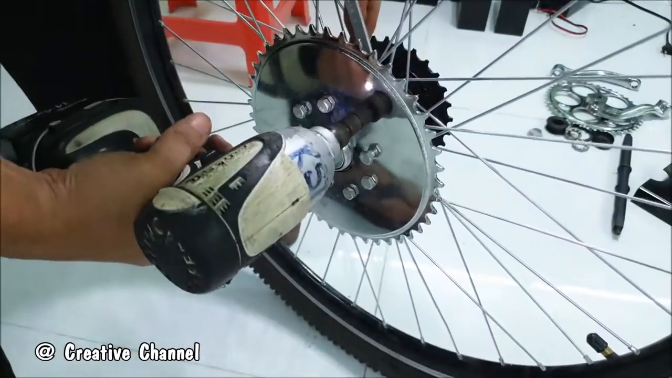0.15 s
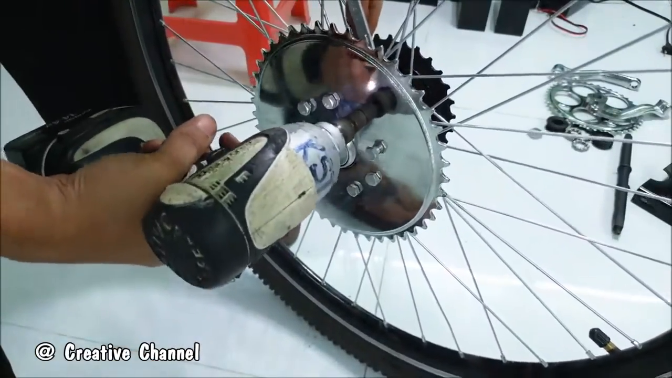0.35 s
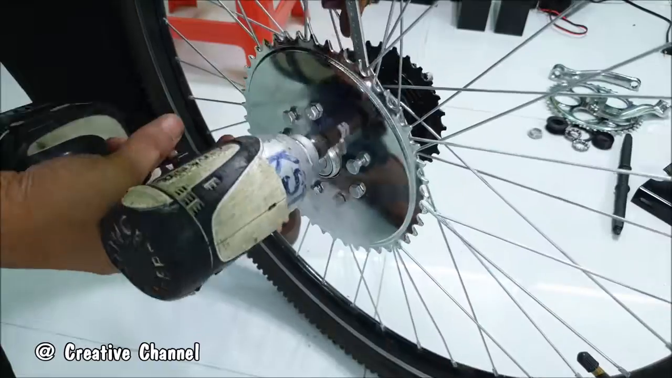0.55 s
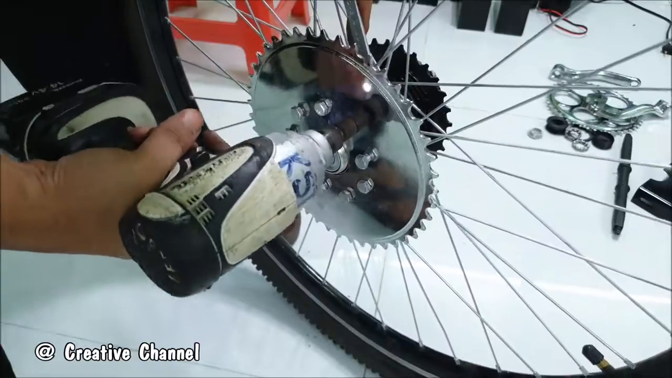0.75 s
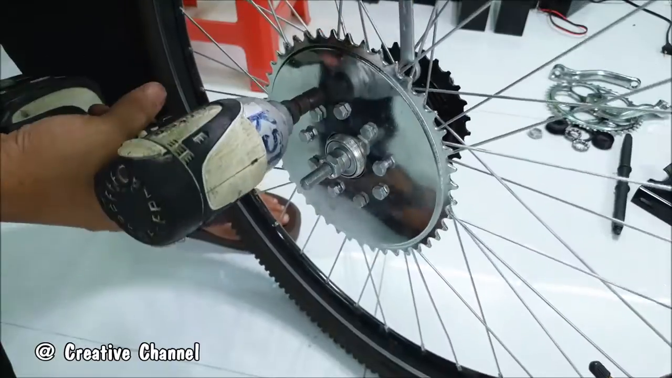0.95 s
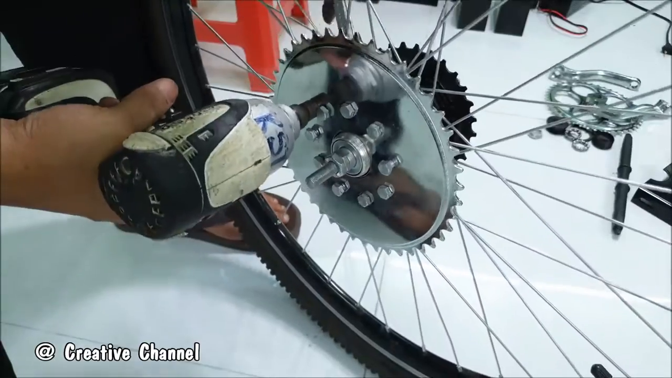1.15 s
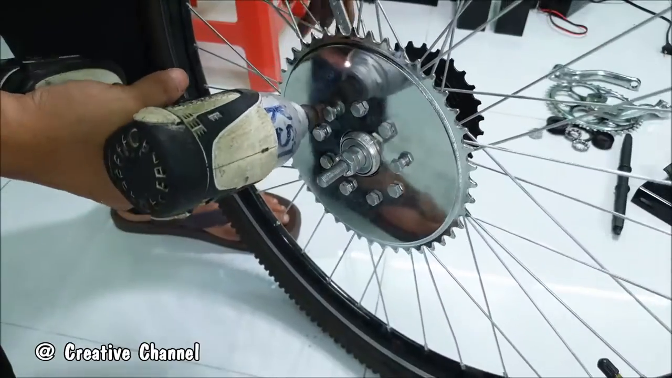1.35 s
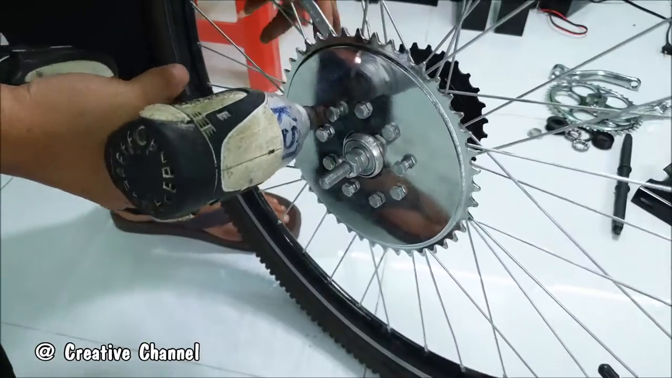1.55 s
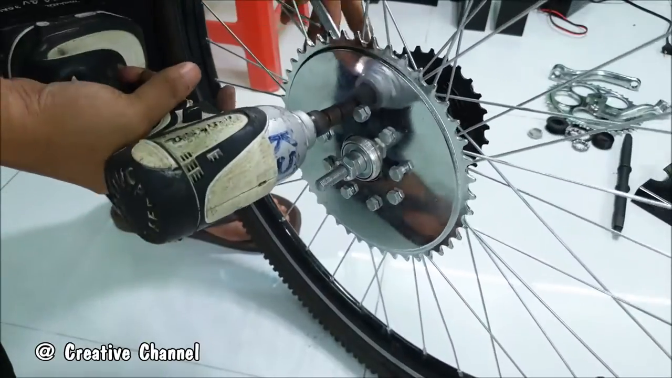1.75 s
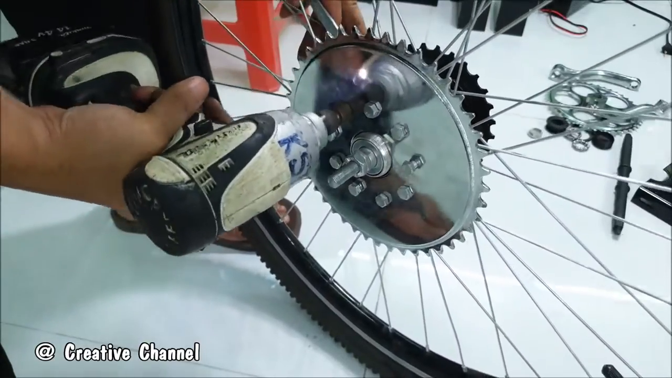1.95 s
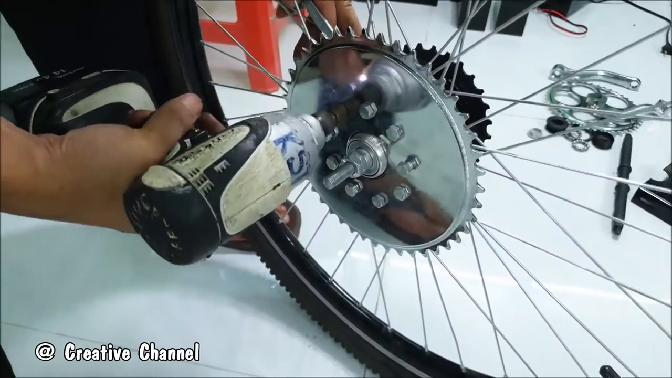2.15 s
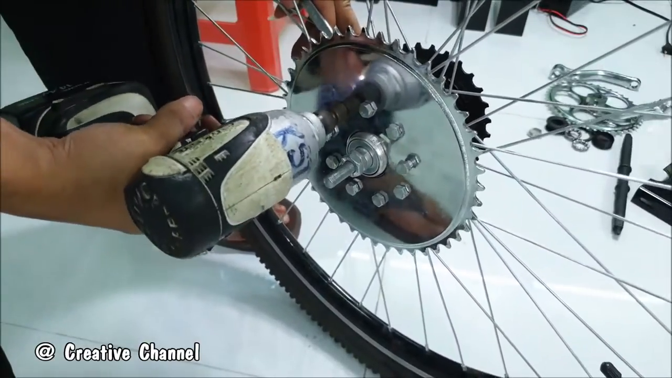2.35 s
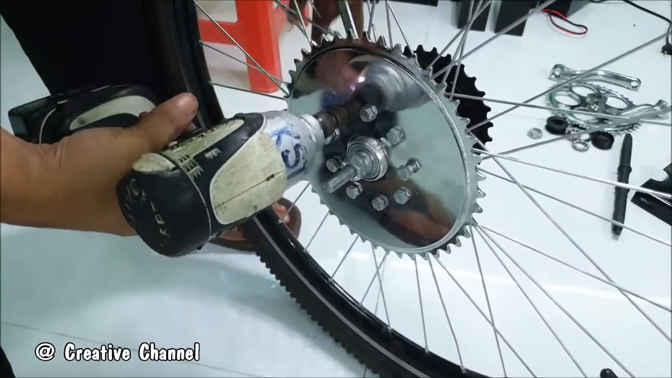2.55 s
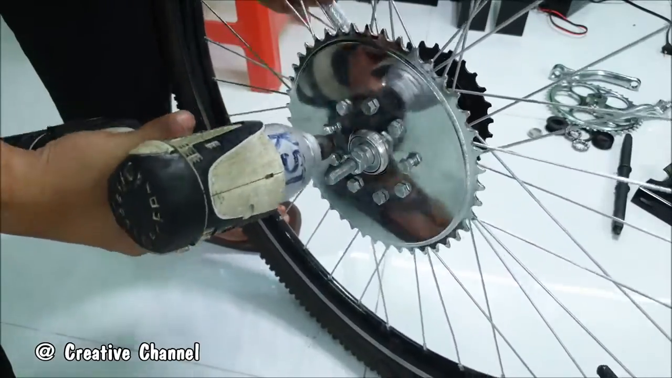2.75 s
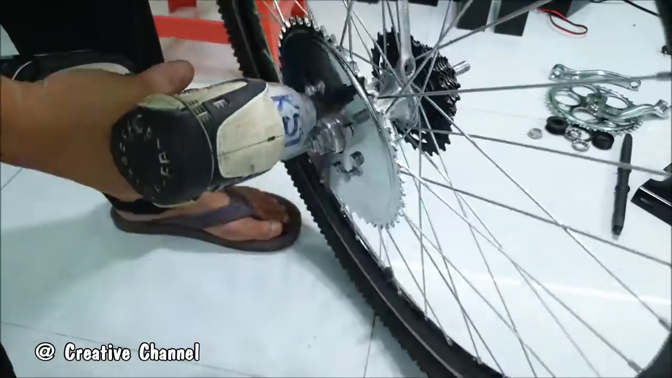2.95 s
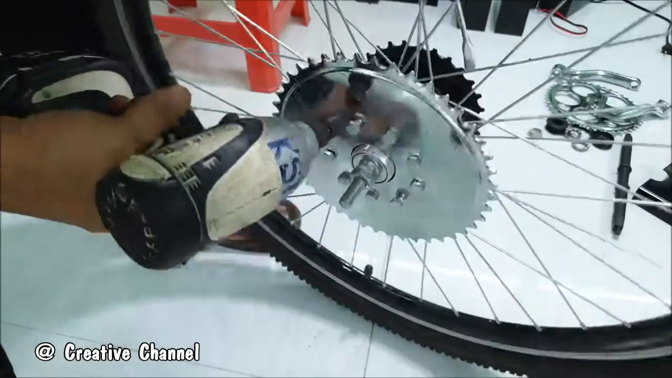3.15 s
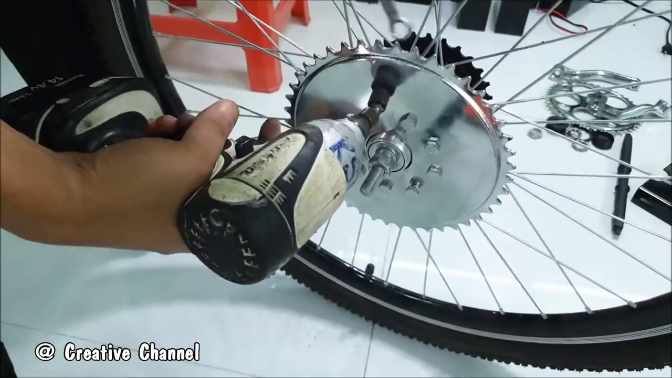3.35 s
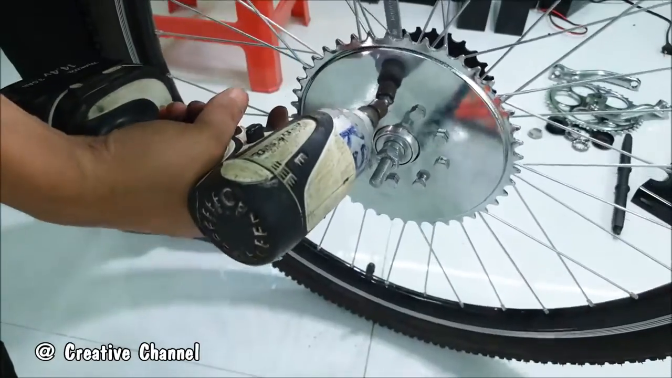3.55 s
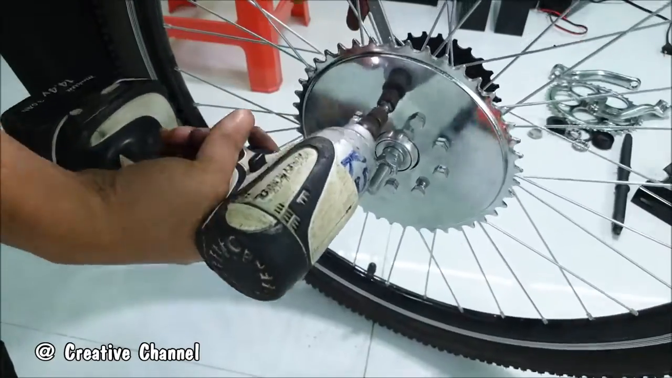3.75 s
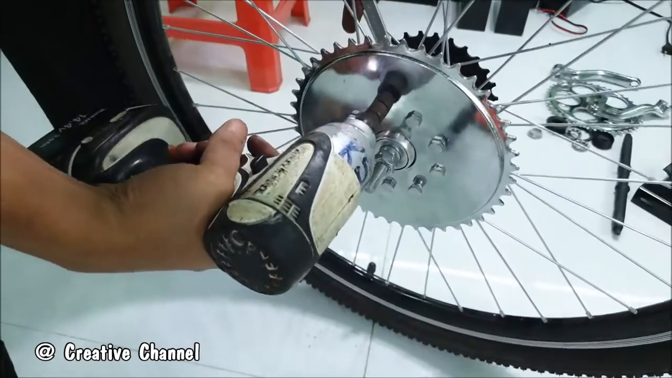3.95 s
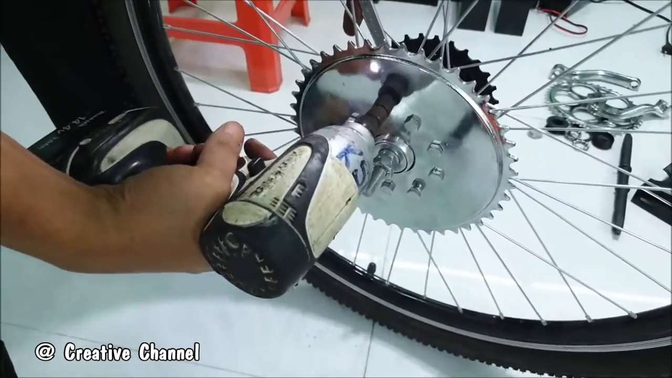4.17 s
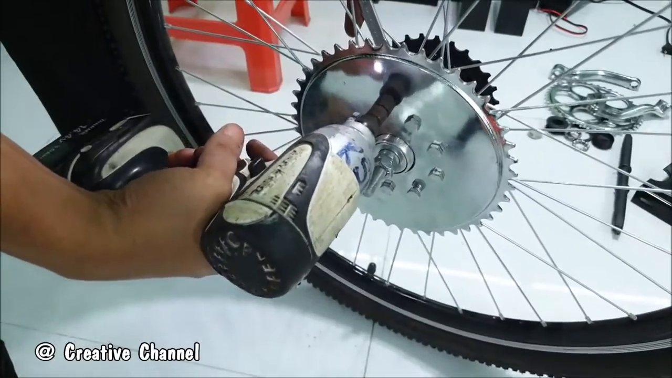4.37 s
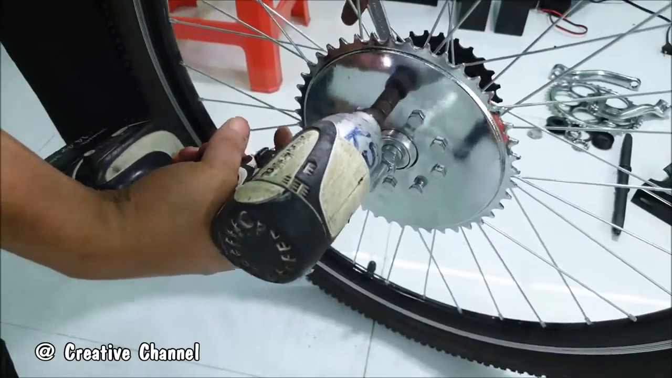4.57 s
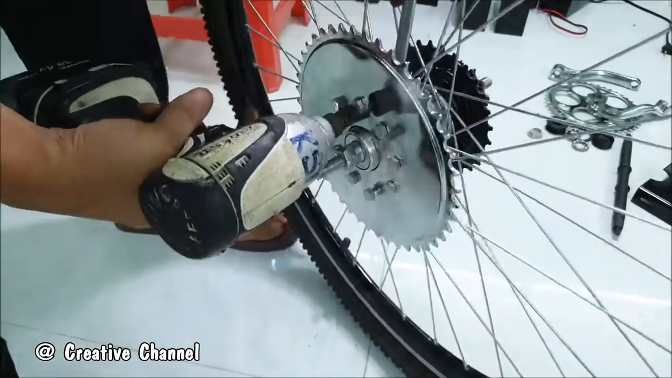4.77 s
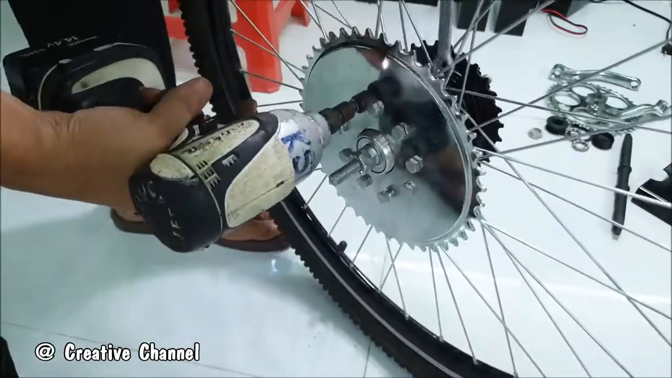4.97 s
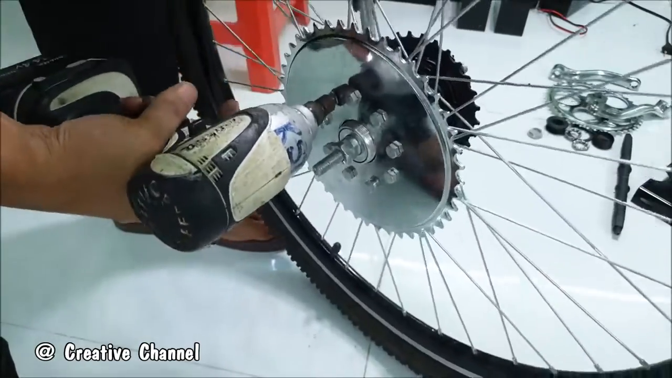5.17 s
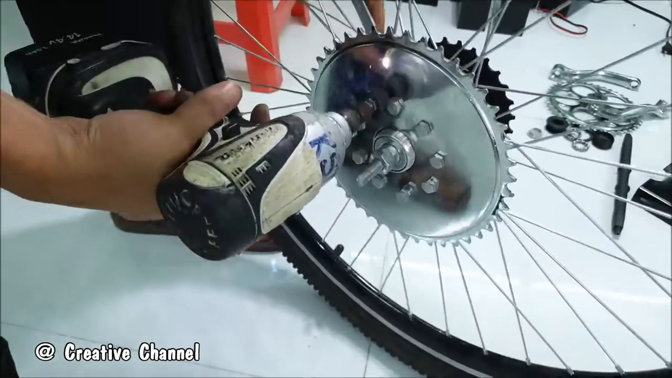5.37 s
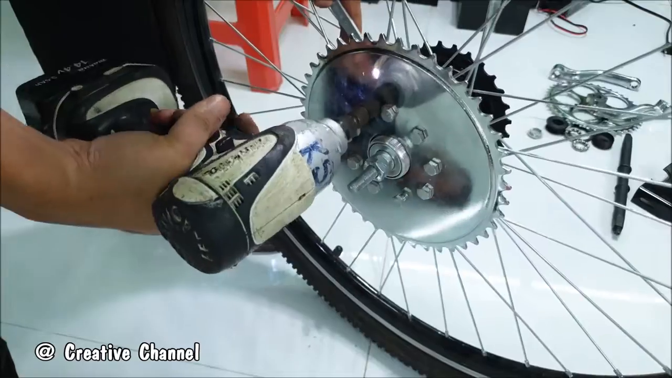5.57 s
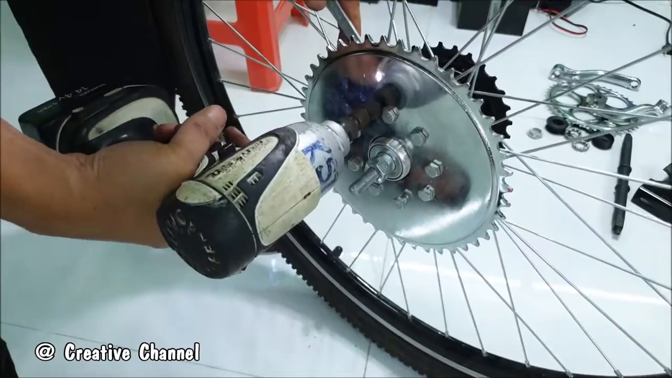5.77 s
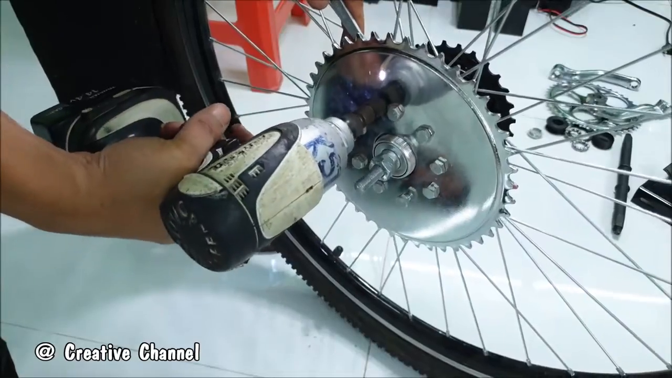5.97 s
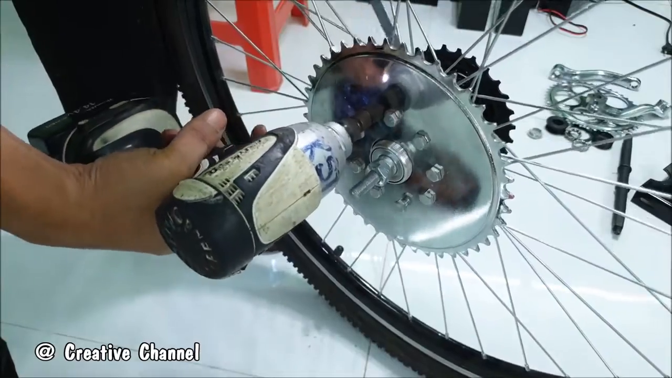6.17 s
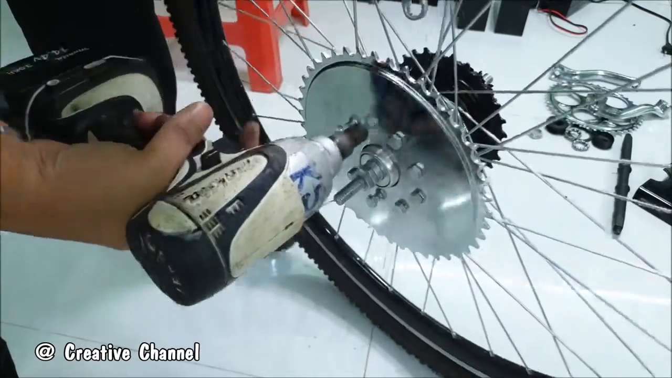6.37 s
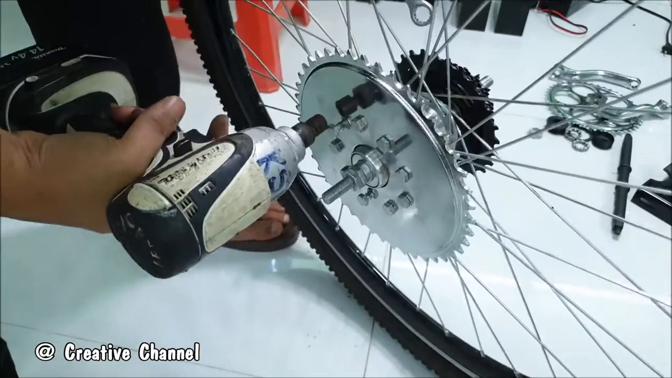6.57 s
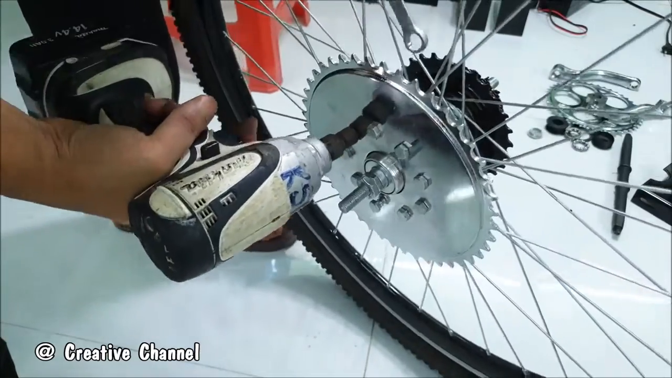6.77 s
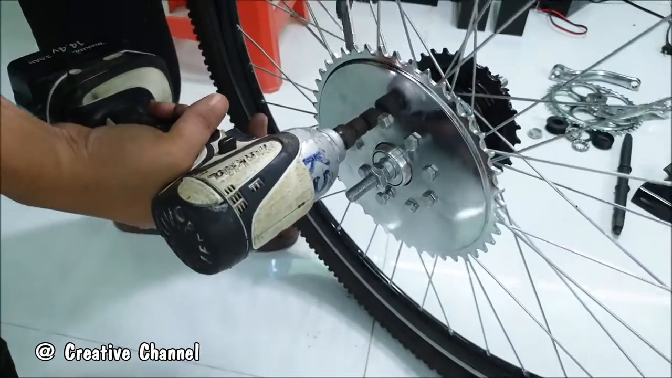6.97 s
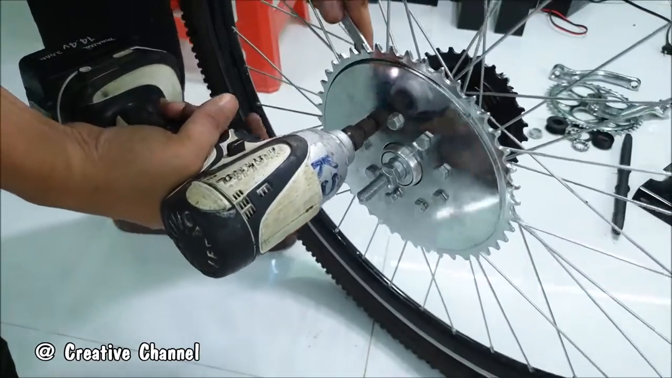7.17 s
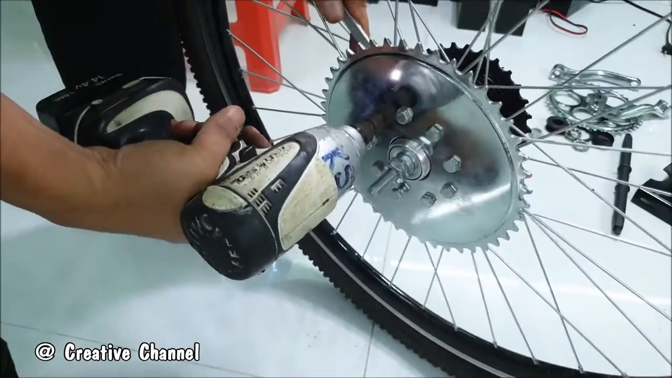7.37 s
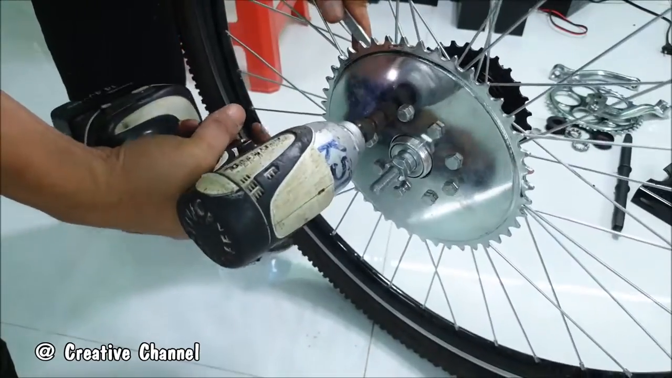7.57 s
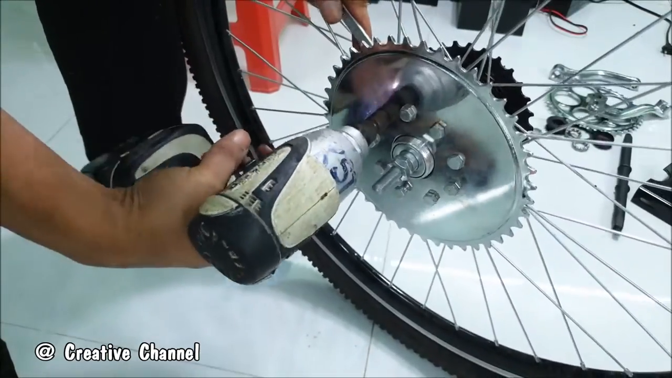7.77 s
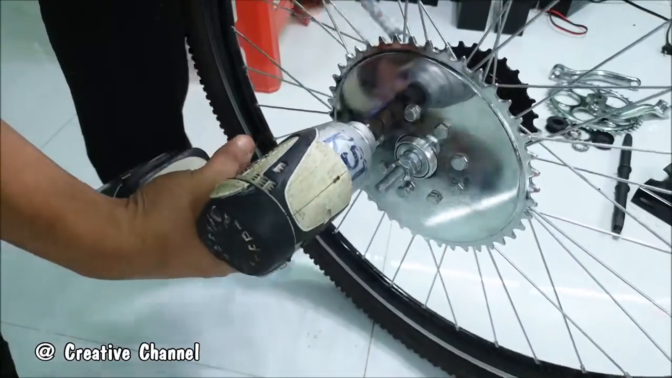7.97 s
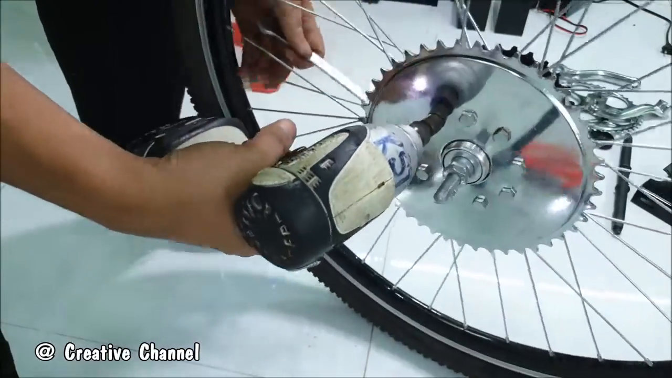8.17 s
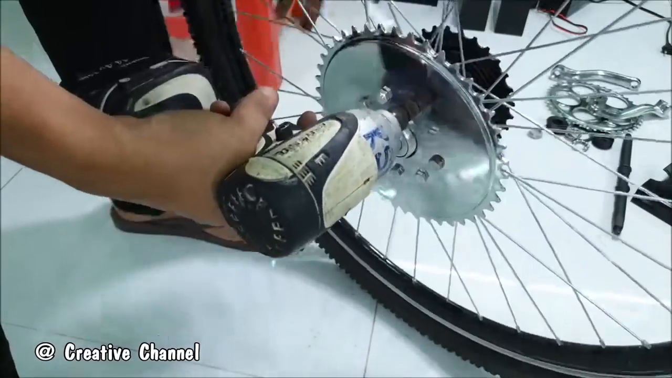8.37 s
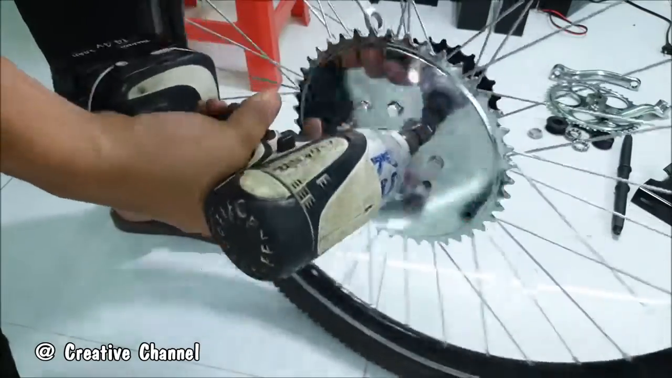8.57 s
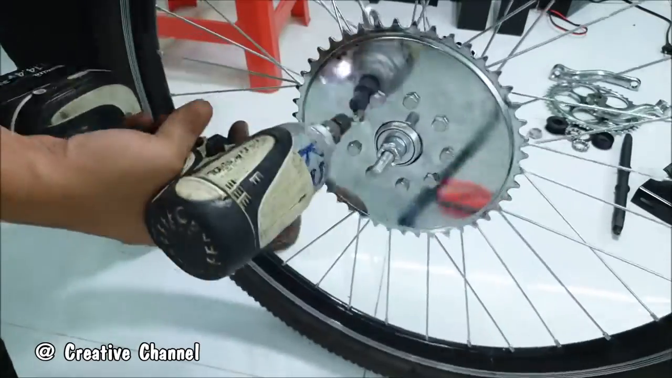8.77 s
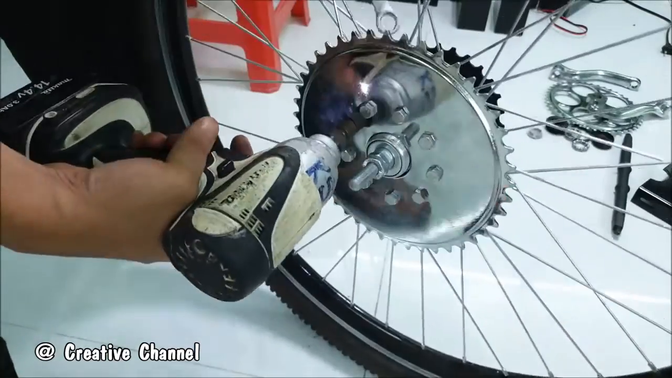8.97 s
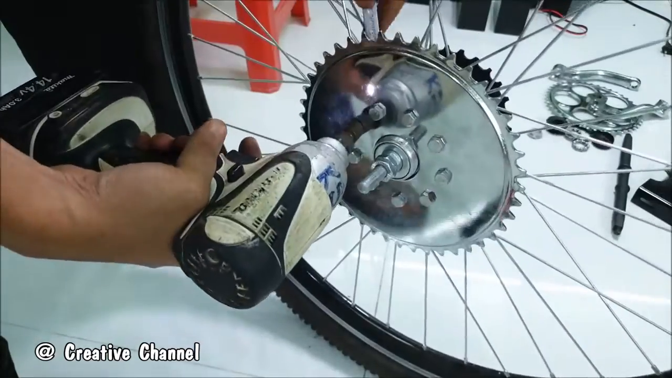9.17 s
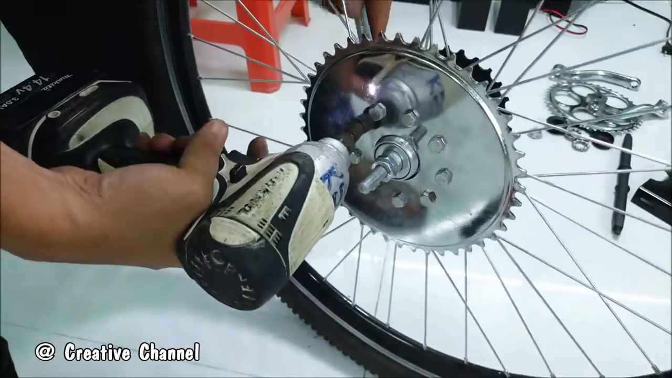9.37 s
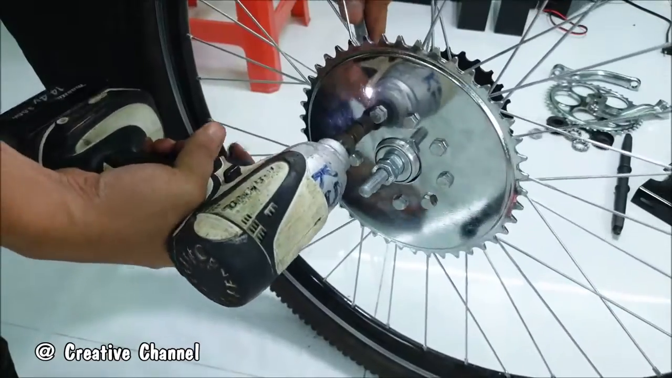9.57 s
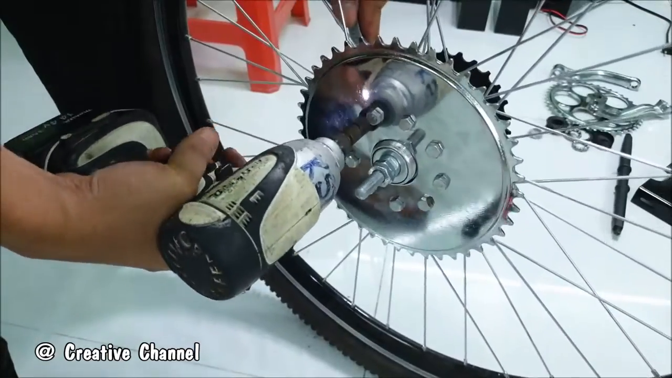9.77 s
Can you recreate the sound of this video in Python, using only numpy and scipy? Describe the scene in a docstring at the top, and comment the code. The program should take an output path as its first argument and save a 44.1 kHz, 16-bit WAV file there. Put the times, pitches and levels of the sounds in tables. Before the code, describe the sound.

Short trigger pulls of a power drill buzz and knock against bike wheel metal, separated by small socket ticks, spanner clinks and quiet hum.

```python
"""A cordless drill is already hammering on a tight nut of a bicycle sprocket, over a fan's hum and faint rubbing.
It goes on in short trigger pulls to the end: noise rasps as gears, uneven bursts knock or fall into a buzz.
Between pulls the socket ticks from 0.6 s (noise bursts ringing steel) and a spanner clinks from 1.2 s (ringing modes).
From 4.9 s a hand slides over the wheel three times. The small workshop adds a short tail to all but the fan.
The recorder's gain starts turned down, ducks under each burst and lets the hum swell back."""
import sys
import numpy as np
from scipy import signal
from scipy.fft import rfft, irfft
from scipy.io import wavfile
from scipy.ndimage import uniform_filter1d

SR = 44100
rng = np.random.default_rng(int(sys.argv[2]) if len(sys.argv) > 2 else 0)


def output_pcm(signal):
    """Save a mono or channel-first signal as 16-bit PCM at the path in sys.argv[1].

    Samples are clipped to [-1, 1] before scaling.
    """
    pcm = np.clip(np.atleast_2d(signal).T, -1, 1) * 32767
    wavfile.write(sys.argv[1], SR, np.round(pcm).astype(np.int16))


N = 433062
TIME = np.arange(N) / SR
# Event levels are set ahead of filters, room and gain control; spectra give a relative balance.


def from_db(db):
    """Decibels to an amplitude factor."""
    return 10 ** (np.asarray(db) / 20)


def rms_one(x):
    """Scale to an rms of 1 over all channels."""
    return x / np.sqrt(np.mean(x ** 2) + 1e-20)


def energy_one(x):
    """Scale each channel to a total energy of 1."""
    return x / np.sqrt(np.sum(x ** 2, axis=-1, keepdims=True) + 1e-20)


def between(ends, share):
    """The value a share of the way from the first end to the second."""
    return ends[0] + (ends[1] - ends[0]) * np.clip(share, 0, 1)


def at_hz(points, hz):
    """Read a curve off its points, along a logarithmic frequency axis."""
    point_hz, values = np.array(points)[:, 0], np.array(points)[:, 1]
    return np.interp(np.log(hz + 1), np.log(point_hz), values)


def add(track, s, sound):
    """Mix a sound into a track from time s on."""
    start = max(round(s * SR), 0)
    part = sound[..., :max(N - start, 0)]
    track[..., start:start + part.shape[-1]] += part


def through(x, response):
    """Play a signal through an impulse response, channel by channel."""
    return signal.oaconvolve(np.atleast_2d(x), np.atleast_2d(response), axes=1)[:, :N]


def high_pass(x, order, hz):
    """Roll off the bottom below a corner frequency."""
    return signal.sosfilt(signal.butter(order, hz, "high", fs=SR, output="sos"), x)


def colour(x, spectrum, size=4096):
    """Causal (minimum-phase) filter with the given spectrum; white noise keeps its level."""
    gains = from_db(at_hz(spectrum, np.fft.rfftfreq(size, 1 / SR)))
    cepstrum = irfft(np.log(gains))
    fold = 1 + np.sign(size / 2 - np.arange(size))
    fold[0] = 1
    return through(x, energy_one(irfft(np.exp(rfft(cepstrum * fold)))))


def drift(rate):
    """Smooth chance with rms 1, heading for a new random value rate times a second."""
    knots = rng.standard_normal(4096)
    return rms_one(np.interp(TIME * rate, np.arange(len(knots)), knots))


def resonate(x, hz, width_hz):
    """A two-pole resonance with gain 1 on top."""
    r = np.exp(-np.pi * width_hz / SR)
    feedback = [1, -2 * r * np.cos(2 * np.pi * hz / SR), r * r]
    return signal.lfilter(np.array([1, 0, -1]) * (1 - r * r) / 2, feedback, x)


def struck(modes):
    """Modes (frequency [Hz], level [dB], t60 [s]) ring after a blow of random balance; energy 1."""
    t = TIME[:SR // 4]
    ring = 0
    for hz, db, t60 in modes:
        envelope = from_db(db + rng.normal(0, 5.0) - 60 * t / t60)
        ring = ring + envelope * np.sin(2 * np.pi * hz * t) * rng.choice([-1, 1])
    return energy_one(ring)


def crunch(decay_s, build=0.043):
    """A contact of many tiny ones: noise building and dying away; two channels, energy 1 each."""
    t = TIME[:SR // 8]
    envelope = np.exp(-t / decay_s) * (1 - np.exp(-t / (build * decay_s)))
    return energy_one(rng.standard_normal((2, len(t))) * envelope)


def blow(db):
    """Size of a blow whose level over a fiftieth of a second is db."""
    return from_db(db) * np.sqrt(SR / 50)


def widen(pair, side_db=-6.0, treble_db=0.5, treble_hz=4000):
    """Two unrelated signals become left and right, with the treble spread widest."""
    treble = high_pass(pair[1], 1, treble_hz)
    side = from_db(side_db) * (pair[1] + from_db(treble_db) * treble)
    return (pair[0] + side * [[1], [-1]]) / np.sqrt(1 + from_db(2 * side_db))


# Trigger pulls: (start [s], stop [s], level [dB], load [0 = nut spins freely, 1 = tight, drill hammers])
PULLS = [(-.1, 0.181, -15, 0.96), (0.231, 0.351, -19, 0.72), (0.385, 0.464, -21, 0.54),
         (0.794, 0.806, -36.5, 0.66), (0.815, 0.881, -22.5, 0.41), (1.879, 2.004, -26.5, 0.064),
         (2.012, 2.034, -26, 0.58), (2.056, 2.168, -23, 1), (2.209, 2.3, -25, 0.33),
         (2.337, 2.51, -21.5, 0.46), (2.553, 2.594, -20, 0.16), (3.829, 3.864, -34, 0.11),
         (3.907, 3.969, -33.5, 0.35), (3.992, 4.133, -18.5, 0.54), (4.151, 4.595, -17, 0.52),
         (5.672, 5.947, -25, 0.33), (5.976, 6.108, -21, 0.66), (6.123, 6.176, -19.5, 0.31),
         (7.266, 7.381, -25, 0.042), (7.417, 7.559, -22.5, 0.68), (7.588, 7.632, -19.5, 0.64),
         (7.663, 7.735, -18.5, 0.53), (7.829, 7.891, -20, .3), (7.916, 7.952, -19.5, 0.9),
         (9.015, 9.042, -40, 0.29), (9.559, 9.61, -41.5, 0.44), (9.644, 9.726, -24.5, 0.15),
         (9.747, 9.815, -23, 0.94)]
# What the load does to a pull: (free nut, tight nut)
SPIN_UP_S = (0.087, 0.0015)
SWELL_DB = (0.5, 0)   # change of level from start to stop
# Free motor speed, the share it lacks as a pull starts, and how fast it catches up
MOTOR_HZ, MOTOR_SAG, MOTOR_RISE_S = 340.1, .13, .02
# On release the motor is braked at once, while the gears coast on quietly
BRAKE_S, COAST_DB, COAST_S = 0.018, -25.5, 0.059


def trigger():
    """Loudness, load and motor speed: a free nut lets the drill swell in, a tight one brings it in at once."""
    loud, loads, motor_hz = np.zeros((3, N))
    for start, stop, db, load in PULLS:
        now = slice(max(int(start * SR), 0), min(int((stop + 1) * SR), N))
        t, length = TIME[now] - start, stop - start
        spin_up_s = np.exp(between(np.log(SPIN_UP_S), load))
        released_s = np.clip(t - length, 0, 1)
        coast = from_db(COAST_DB) * np.exp(-released_s / COAST_S)
        run_down = np.maximum(np.exp(-released_s / BRAKE_S), coast)
        swell_db = between(SWELL_DB, load) * (np.minimum(t / length, 1) - .5)
        pull = np.clip(t / spin_up_s, 0, 1) * run_down * from_db(db + swell_db)
        loud[now] = np.maximum(loud[now], pull)
        loads[now] = load
        motor_hz[now] = MOTOR_HZ * (1 - MOTOR_SAG * np.exp(-t / MOTOR_RISE_S))
    return loud, loads, motor_hz


# Stretches in which the hammer falls into an even beat: (start [s], stop [s], evenness [0-1])
HAMMERING = [(.01, 0.167, 0.8), (2.065, 2.194, .8), (2.253, 2.314, 0.7), (2.361, 2.536, 0.83),
             (4.014, 4.101, 0.88), (4.166, 4.491, 1), (5.73, 5.937, 0.67), (6.021, 6.109, .4),
             (7.44, 7.567, 0.79), (7.68, 7.731, 0.54), (9.758, 9.9, 1)]
SETTLE_S = 0.025   # time the hammer needs to find or lose its beat


def beat():
    """How evenly the hammer beats over time, 0-1."""
    total = 0
    for start, stop, even in HAMMERING:
        inside_s = np.minimum(TIME - start, stop - TIME)
        total = total + even * np.clip(inside_s / SETTLE_S + .5, 0, 1)
    return np.clip(total, 0, 1)


def hammer(angle, decay_s=0.00097, uneven_db=7.5, tint_db=1.0, split_hz=9500):
    """One sharp noise burst a turn, each of its own strength and brightness; two channels, rms 1."""
    blows = np.diff(np.floor(angle), prepend=0) * from_db(uneven_db * np.clip(rng.standard_normal(N), -2, 1))
    out = 0
    for half in "low", "high":
        sizes = blows * from_db(tint_db * np.clip(rng.standard_normal(N), -2, 1))
        envelope = signal.lfilter([1], [1, -np.exp(-1 / (decay_s * SR))], sizes + 1e-18)
        bursts = envelope * rng.standard_normal((2, N))
        out = out + signal.sosfilt(signal.butter(2, split_hz, half, fs=SR, output="sos"), bursts)
    return widen(rms_one(out))


def turning(angle, change_rate, count, size=4096):
    """The same rough surfaces meet on every turn: count harmonics whose balance keeps shifting; rms 1."""
    harmonics = np.exp(2j * np.pi * rng.random((3, count)))
    patterns = irfft(np.pad(harmonics, ((0, 0), (1, 0))), size)
    weights = np.array([drift(change_rate) for _ in patterns])
    mixed = np.sum(weights * patterns[:, (angle * size).astype(int) % size], axis=0)
    return rms_one(mixed / np.sqrt(np.sum(weights ** 2, axis=0) + .5))


def shudder(x, shift_db=4.5, lowest_hz=900, highest_hz=7500, width_share=0.053, count=24):
    """Tool and wheel shake against each other: narrow resonances swell and drop out within the rasp."""
    for hz in np.geomspace(lowest_hz, highest_hz, count):
        swing = from_db(shift_db * np.clip(1.3 * drift(24) - .5, -4, 1.6)) - 1
        x = x + swing * resonate(x, hz, width_share * hz)
    return x


def glance(x, echo_db=-12.0, path_s=.004, sway_s=.00016, count=3):
    """Echoes off the turning sprocket: their paths keep changing, and the colour shifts with them."""
    out = x.copy()
    for k in range(count):
        lag_s = path_s * (k + 1) / count + sway_s * drift(9.9)
        source = np.clip(np.round((TIME - lag_s) * SR).astype(int), 0, N - 1)
        out += (-1) ** k * from_db(echo_db) * x[:, source]
    return out / np.sqrt(1 + count * from_db(2 * echo_db))


# Sprocket resonances that the socket rattles: (frequency [Hz], width [Hz], level [dB])
SPROCKET = [(770, 150, 1), (1297, 51, 11.5), (1550, 130, 2), (1950, 120, 4), (2780, 210, -5),
            (2840, 230, 1), (3040, 350, 1.5), (3380, 1100, 1), (4140, 440, 0), (4840, 270, 7.5),
            (5590, 74, -9), (6680, 440, 0)]


def sprocket(force, shift_db=7.5):
    """As the socket wobbles on its nut, now one resonance is driven harder, now another."""
    rings = 0
    for hz, width, db in SPROCKET:
        drive = from_db(db + shift_db * np.clip(drift(22), -2, 2))
        rings = rings + resonate(force * drive, hz, width)
    return rms_one(rings) * np.sqrt(np.mean(force ** 2))


# The hammer's buzz: (multiple of the hammer rate, level [dB])
HAMMER_ORDERS = [(1, -19), (2, -7.5), (3, 4.5), (4, -6.5), (5, -1.5), (6, -2.5), (7, -9.5), (8, -1.5),
                 (9, -6), (10, -9.5), (11, -14), (12, -10), (13, -1), (14, -5.5)]


def buzz(angle, waver_db=3.0):
    """The blows shake housing and wheel alike on every turn: a stack of wavering harmonics; rms 1."""
    stack = 0
    for order, db in HAMMER_ORDERS:
        level = from_db(db + waver_db * drift(12))
        stack = stack + level * np.sin(2 * np.pi * (round(order) * angle + rng.random()))
    return rms_one(stack)


# Spectrum of the motor's whirr: (frequency [Hz], level [dB])
WHIRR = [(150, -5), (320, -5), (650, 0), (960, -4), (1300, -1.5), (2000, 0.5), (3000, 5.5), (5000, 1),
         (8000, -5.5), (15000, -11.5)]


def whirr(motor_hz, wobble=.015, change_rate=14):
    """Motor and gear train sing as shifting harmonics of the motor's wobbling speed."""
    angle = np.cumsum(motor_hz * (1 + wobble * drift(25))) / SR
    return colour(turning(angle, change_rate, count=42), WHIRR)


# Hammer rate before its wander: (time [s], rate [blows per s])
SPEED = [(0, 134), (.05, 136), (.12, 133), (.17, 142), (1.93, 135), (2.06, 115), (2.11, 154), (2.17, 144),
         (2.28, 142), (2.39, 146), (2.44, 150), (2.5, 139), (2.57, 133), (4.0, 132), (4.06, 138),
         (4.17, 132), (4.24, 140), (4.3, 145), (4.44, 142), (4.5, 135), (4.56, 128), (5.68, 150),
         (5.75, 162), (5.8, 145), (5.86, 158), (5.91, 173), (5.97, 152), (6.16, 144), (7.42, 150),
         (7.45, 155), (7.51, 184), (7.56, 174), (7.62, 125), (7.71, 148), (9.7, 124), (9.8, 124)]
# Spectrum of the gear rasp: (frequency [Hz], level [dB per Hz])
GEARS = [(30, -51.5), (100, -18), (250, -10.5), (600, -30.5), (1000, -32), (1500, -12), (2200, -3),
         (3200, -3), (4500, 0.5), (7000, 3.5), (9800, 1.5), (12500, 3), (15000, 0)]
# Spectrum of the hammer's knocks: (frequency [Hz], level [dB per Hz])
KNOCK_COLOUR = [(100, -30.5), (1000, -13), (3000, -15.5), (5000, -6.5), (7300, -0.5), (9800, -4),
                (12500, -0.5), (15000, 0.5)]
# Drill housing resonances: (frequency [Hz], width [Hz], level [dB])
HOUSING = [(300, 120, -15), (405, 48, 0.5), (727, 98, -7), (1240, 95, -11)]
STUMBLE = (.11, .007)   # share by which the hammer rate wanders: (off the beat, on the beat)
# By load, (free nut, tight nut): knocks against teeth before knock_db, then levels relative to the pull
KNOCK_STRENGTH = (0.27, 1.1)
RATTLE_DB, BUZZ_DB, WHIRR_DB = (-12.5, -12.5), (-11, -15.5), (-10, -14.5)
DRONE_DB = (-18, -20)   # off the beat


def drill(knock_db=3.0, grit_db=3.0, rasp_db=2.43, clatter_db=-7.5, beat_drone_db=-6.5):
    """Gears rasp, the motor whirrs, the hammer stumbles or buzzes, the sprocket rattles, the housing drones."""
    loud, load, motor_hz = trigger()
    even = beat()
    wander = np.exp(between(np.log(STUMBLE), even)) * drift(70)
    angle = np.cumsum(np.interp(TIME, *np.transpose(SPEED)) * (1 + wander)) / SR   # turns, one blow each
    grit = from_db(grit_db * uniform_filter1d(rng.standard_normal(N), size=25) * np.sqrt(25))

    # Under load, more of the motor's effort goes into the knocks
    share = between(KNOCK_STRENGTH, load) * from_db(knock_db)
    effort = loud / np.sqrt(1 + share ** 2)
    knocks = effort * share * hammer(angle)
    teeth = effort * widen(rms_one(grit * rng.standard_normal((2, N))))
    clatter = effort * even * from_db(clatter_db) * turning(angle, 12, count=50)
    rasp = colour(shudder(glance(teeth + clatter)), GEARS) + colour(knocks, KNOCK_COLOUR)

    shaking = widen(rms_one(grit * rng.standard_normal((2, N))))
    rattle = sprocket(loud * from_db(between(RATTLE_DB, load)) * shaking)

    impulse = signal.unit_impulse(SR // 8)
    housing = 0
    for k, (hz, width, db) in enumerate(HOUSING):
        housing = housing + (-1) ** k * from_db(db) * resonate(impulse, hz, width)
    drone_db = between(DRONE_DB, load) + beat_drone_db * even
    drone = through((teeth + knocks) * from_db(drone_db), energy_one(housing))

    # The even beat trades the whirr for the buzz
    buzzing = even * from_db(between(BUZZ_DB, load)) * buzz(angle)
    whirring = (1 - even) * from_db(between(WHIRR_DB, load)) * whirr(motor_hz)
    return from_db(rasp_db) * rasp + rattle + drone + loud * (buzzing + whirring)


# Likeness of the two channels: (frequency [Hz], likeness [0-1])
LIKENESS = [(30, 0.14), (130, 0.9), (350, 0.94), (700, 0.83), (2000, 0.7), (5000, 0), (15000, .45)]
# Spectrum of the moving air: (frequency [Hz], level [dB per Hz])
FAN_AIR = [(30, -34.5), (60, -46), (90, -6.5), (130, -19.5), (240, -7), (370, -4), (520, -6.5), (750, -12),
           (1200, -9), (1900, -9.5), (3000, -17), (6000, -23.5), (11000, -53), (15000, -58)]
# Fan tones: (frequency [Hz], level [dB], width of the pitch wander [Hz])
FAN_TONES = [(236, -89.5, 35), (320, -74, 5.964), (340, -74, 7.5), (411.5, -71, 5.89), (514, -89, 11),
             (1196, -71, 7), (1910, -81, 4.5)]
FAN_DB = -66   # moving air


def fan():
    """Moving air is noise partly alike in both channels; the hum is a set of sines with wavering pitch."""
    alike = np.clip(at_hz(LIKENESS, np.fft.rfftfreq(2 * SR, 1 / SR)), 0, 1)
    layers = []
    for part in (1 + alike, 1 - alike):   # mid, then side
        kernel = np.fft.fftshift(irfft(np.sqrt(part / 2)))[SR - 128:SR + 128]
        layers.append(through(rng.standard_normal(N), kernel))
    mid, side = layers
    air = from_db(FAN_DB) * colour(mid + side * [[1], [-1]], FAN_AIR)
    tones = 0
    for hz, db, width in FAN_TONES:
        phase = 2 * np.pi * np.cumsum(hz + width / 2 * drift(25)) / SR
        tones = tones + from_db(db) * np.sqrt(2) * np.sin(phase)
    return air + tones


# A hand slides over the wheel: (start [s], length [s], level [dB])
RUBS = [(4.939, 0.058, -56), (6.796, 0.21, -63), (8.255, 0.21, -68.5)]
# Spectrum of light contact, for rubs, ticks and scrapes: (frequency [Hz], level [dB per Hz])
TICK_COLOUR = [(100, -15.5), (600, -24.5), (1500, 0), (3000, 0.5), (5000, 3.5), (7500, 5), (10000, 1.5),
               (13000, 3), (15000, 0)]
RUSTLE_DB = -78   # constant faint rubbing


def handling():
    """Hands and tools rub on the wheel: noise under fluctuating pressure, stronger when a hand slides."""
    effort = np.full(N, from_db(RUSTLE_DB))
    for s, length, db in RUBS:
        add(effort, s, from_db(db) * np.hanning(int(length * SR)))
    pressure = from_db(3 * drift(7) + 5 * np.clip(drift(150), -2, 2))
    return colour(effort * widen(rms_one(pressure * rng.standard_normal((2, N)))), TICK_COLOUR)


# The drill jolts the wheel as a nut takes load: (time [s], level [dB])
JOLTS = [(0.021, -37), (.245, -39.5), (.398, -45.5), (1.909, -51), (2.36, -46), (2.566, -51), (4.0, -39),
         (4.268, -36), (4.565, -56), (5.7, -41.5), (7.492, -35), (7.69, -40.5), (7.925, -43), (9.671, -38)]
# The wheel's dull modes: (frequency [Hz], level [dB], t60 [s])
WHEEL = [(170, -29.5, .05), (253, -19, .05), (350, -0.5, 0.015), (385.5, 5.5, 0.16), (416, -0.5, .06),
         (480, -18, .06), (560, -9.5, .025), (660, 0.5, 0.037), (764, 1, .025), (930, -8.5, 0.029),
         (1260, -17, .025)]
JOLT_DECAY_S = 0.025


def jolts(thump_hz=125, thump_width_hz=70, thump_db=-2.5, wheel_db=5.5, lowest_hz=70):
    """Dull thumps through tyre and frame, which also set the wheel droning."""
    push = np.zeros((2, N))
    for s, db in JOLTS:
        add(push, s, blow(db) * crunch(JOLT_DECAY_S))
    push = widen(push)
    frame = energy_one(resonate(signal.unit_impulse(SR // 8), thump_hz, thump_width_hz))
    thumps = from_db(thump_db) * through(push, frame)
    drone = from_db(wheel_db) * through(push, struck(WHEEL))
    return high_pass(thumps + drone, 1, lowest_hz)


# Socket touching nuts and sprocket: (time [s], level [dB], firmness [0 = glancing scrape, 1 = square hit])
TOUCHES = [(.636, -49, 0.25), (.684, -45, 0.83), (0.7388, -31.5, 0.7), (1.033, -44, 0.12),
           (1.126, -50.5, 0.6), (1.1853, -50.5, 0.59), (1.232, -51, 0.17), (1.472, -54, 0.76),
           (1.255, -51.5, 0.61), (1.442, -60.5, .5), (1.5356, -58.5, 0.72), (1.751, -48, 0.79),
           (1.774, -54, 1), (1.806, -40, 0.67), (2.717, -33.5, 0.4), (2.792, -45.5, 0.49),
           (2.961, -51, 0.47), (3.033, -41.5, 0.035), (3.286, -55.5, 0.27), (3.3162, -52, 0.83),
           (3.686, -55, 0.4), (3.751, -47, 0.41), (4.8253, -37, 0.66), (5.001, -42, 0.34),
           (5.1944, -44, 0.63), (5.227, -50, 0.5), (5.29, -53, 0.21), (5.309, -54, 0.79),
           (5.3432, -49.5, 0.57), (5.417, -54.5, 0.97), (5.019, -40.5, 0.64), (5.606, -42, 0.1),
           (5.619, -30.5, 0.69), (6.254, -33, 0.082), (6.526, -51, 0.37), (6.721, -45.5, 0.89),
           (6.754, -48.5, 1), (6.7754, -45.5, 1), (6.841, -56.5, 0.21), (7.184, -43.5, 0.21),
           (8.7196, -62, .6), (8.8885, -53.5, 0.35), (8.983, -38.5, 0.93), (9.2791, -41.5, 0.7),
           (9.42, -57, 0.56), (9.458, -56.5, 0.66)]
REBOUND_DB = (-4.5, -12)   # relative to the touch: (glancing, square)
REBOUND_S, REBOUND_SCATTER = 0.015, 0.37   # mean delay, and the share by which it varies


def contacts():
    """Rows (time [s], level [dB], firmness) of every contact: each touch has a weaker rebound."""
    rebounds = []
    for s, db, firm in TOUCHES:
        delay_s = REBOUND_S * (1 + REBOUND_SCATTER * rng.uniform(-1, 1))
        rebounds.append((s + delay_s, db + between(REBOUND_DB, firm), firm))
    return list(TOUCHES) + rebounds


# What firmness does to a contact: (glancing, square)
CONTACT_S = (0.017, 0.0032)
CRACK_DB, THUD_DB = (-15.5, -9.5), (-46.5, -4)   # steel crack and wheel thud, relative to the contact
STEEL_T60_S = .035


def socket(tick_db=-6.5, steel_db=-16.0, vary_db=7.5, lowest_hz=170, crack_s=0.0003):
    """Each contact is a crack and tick of noise, a sprocket ring that varies by spot, and a wheel thud."""
    ticks, rings, thuds = np.zeros((2, N)), np.zeros((2, N)), np.zeros(N)
    for s, db, firm in contacts():
        decay_s = np.exp(between(np.log(CONTACT_S), firm))
        tick = blow(db + tick_db) * crunch(decay_s)
        crack = blow(db + between(CRACK_DB, firm)) * crunch(crack_s)
        add(ticks, s, tick + crack)
        modes = [(hz, mode_db + rng.normal(0, vary_db), STEEL_T60_S) for hz, _, mode_db in SPROCKET]
        steel = struck(modes)
        add(rings, s, blow(db + steel_db) * energy_one(through(crunch(decay_s), steel)))
        add(thuds, s, blow(db + between(THUD_DB, firm)) * struck(WHEEL))
    return widen(colour(ticks, TICK_COLOUR) + rings) + high_pass(thuds, 2, lowest_hz)


# Spanner slipping on a nut: (time [s], pitch [Hz], ring level [dB], scrape level [dB], slip decay [s])
CLINKS = [(1.184, 1420, -54, -55.5, 0.0088), (3.449, 1656, -57, -60, 0.026), (3.46, 1560, -51, -52, 0.0099),
          (3.5043, 1293, -47, -49.5, 0.012), (3.515, 1299, -52.5, -72, 0.0065),
          (3.542, 1310, -52.5, -66, 0.0087), (3.565, 1513, -54.5, -53.5, 0.01),
          (3.605, 1400, -62, -78, .014), (5.0477, 1490, -46, -44.5, 0.022),
          (5.1253, 1360, -46.5, -45.5, 0.007), (5.147, 1337, -55, -47.5, 0.0061),
          (7.056, 1320, -46, -58, 0.0072), (7.1055, 1390, -55, -51.5, 0.0077),
          (7.121, 1415, -69, -59, 0.012), (8.017, 1401, -48, -43, 0.016), (8.04, 1421, -49, -67, 0.027),
          (8.105, 1444, -54, -59.5, 0.009), (8.187, 1313, -72, -74, 0.0055)]
# Bending modes, damped by the hand: (multiple of the pitch, level [dB], t60 [s])
SPANNER_LOW = [(.88, -3, .03), (.95, 0.5, .05), (1, 5.5, 0.081), (1.07, -1, .05), (1.16, -7.5, .07),
               (2.08, 5, .04), (3.1, 7, 0.043)]
# Bright upper modes: (frequency [Hz], level [dB], t60 [s])
SPANNER_HIGH = [(2720, -10.5, 0.09), (3030, -5.5, 0.01), (4247, -4, 0.078), (5064, 1, 0.027),
                (5330, -4, 0.032), (6580, 1, 0.036), (7350, 4, 0.057), (8900, 1, 0.049),
                (9700, -16.5, 0.01), (10970, -0.5, .04)]


def spanner(bright_db=1.0, hiss_db=1.5, catch_db=-0.5, focus_hz=500):
    """A jerky scrape sets the spanner ringing; the pitch of its bending modes depends on how it is held."""
    rings, scrapes = np.zeros((2, 2, N))
    for s, pitch, ring_db, scrape_db, slip_s in CLINKS:
        slip = crunch(slip_s)
        jerks = uniform_filter1d(rng.standard_normal(slip.shape[1]), size=81) * np.sqrt(81)
        slip = energy_one(slip * from_db(catch_db * jerks))
        low_modes = [(pitch * ratio, db, t60) for ratio, db, t60 in SPANNER_LOW]
        bending = resonate(struck(low_modes), pitch, focus_hz)
        bright = struck(SPANNER_HIGH)
        for ring, level_db in (bending, ring_db), (bright, scrape_db + bright_db):
            add(rings, s, blow(level_db) * energy_one(through(slip, ring)))
        add(scrapes, s, blow(scrape_db + hiss_db) * slip)
    return widen(rings + colour(scrapes, TICK_COLOUR))


def sing(x, sing_hz=4300, spread_hz=55, sing_db=-14.0, width_hz=2.4):
    """Three close, lightly damped modes of the steel disc sing on faintly after the tool has stopped."""
    modes = sum(resonate(x, sing_hz + k * spread_hz, width_hz) for k in (-1, 0, 1))
    return x + from_db(sing_db) * modes


ROOM_T60_S, ROOM_DB = 0.17, -8.5


def workshop(x, lag_count=1):
    """Direct sound, one sample later on the right, and the room's short tail of decaying noise."""
    t = TIME[:SR // 2]
    direct = np.array([signal.unit_impulse(len(t)), signal.unit_impulse(len(t), lag_count)])
    decay = from_db(-60 * t / ROOM_T60_S) * (t > .003)
    tail = energy_one(rng.standard_normal((2, len(t))) * decay)
    return through(x, energy_one(direct + from_db(ROOM_DB) * tail))


def scene():
    """Tools and wheel sound in the workshop; the fan is laid in without the room."""
    steel = sing(drill() + socket())
    return workshop(steel + jolts() + spanner() + handling()) + fan()


def gain_control(x, threshold_db=-44.5, slope=0.58, attack_s=0.066, release_s=0.26, held_db=15.0, size=64):
    """Gain falls quickly when the level passes the threshold and creeps back; it starts turned down."""
    power = uniform_filter1d(np.mean(x ** 2, axis=0), size=441)
    level_db = 10 * np.log10(np.maximum(power, 1e-12))[::size]
    cut_db, cuts = held_db, []
    for wanted in slope * np.maximum(level_db - threshold_db, 0):
        cut_db += (wanted - cut_db) * size / SR / (attack_s if wanted > cut_db else release_s)
        cuts.append(cut_db)
    return x * from_db(-np.interp(TIME, TIME[::size], cuts))


CUTOFF_HZ = 15200


def record(dry):
    """Gain control, then a steep low-pass takes off the top."""
    low_pass = signal.ellip(10, .1, 70, CUTOFF_HZ, fs=SR, output="sos")
    return signal.sosfilt(low_pass, gain_control(dry))


dry = scene()
out = record(dry)
output_pcm(out)
```